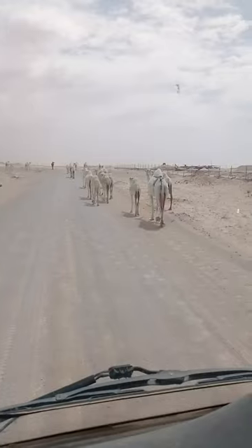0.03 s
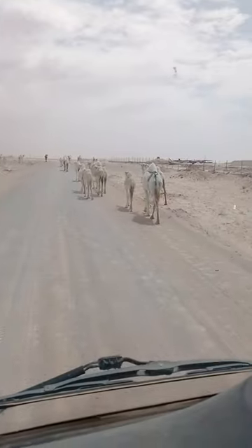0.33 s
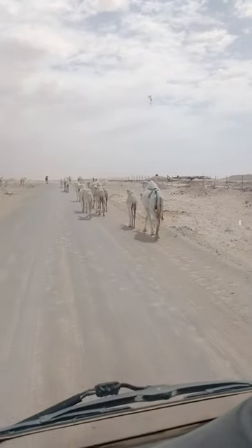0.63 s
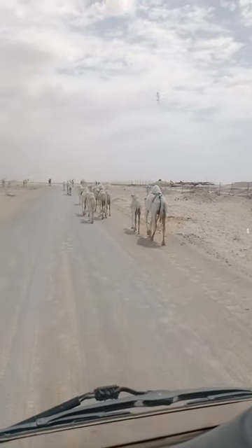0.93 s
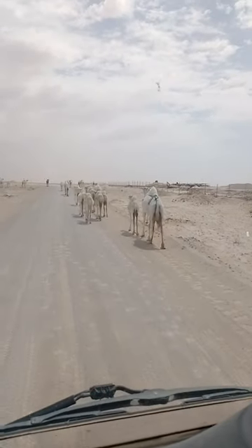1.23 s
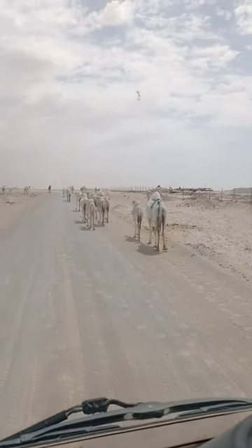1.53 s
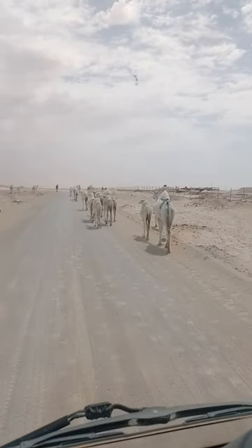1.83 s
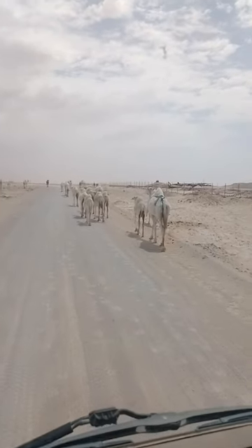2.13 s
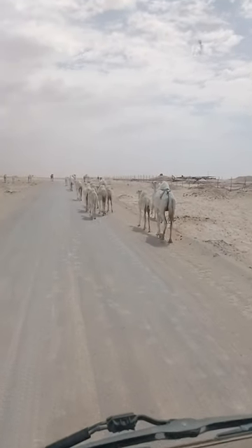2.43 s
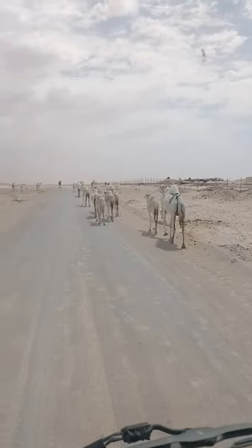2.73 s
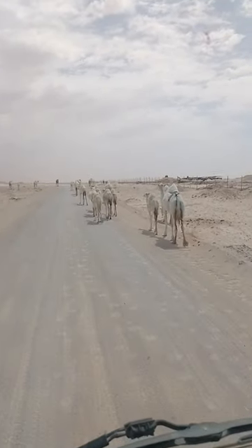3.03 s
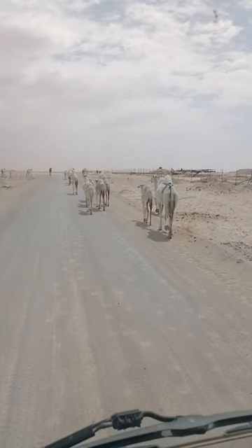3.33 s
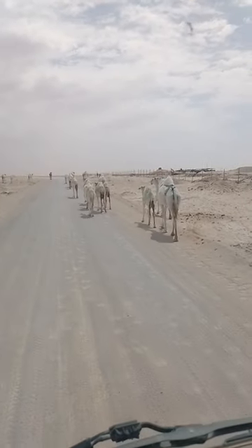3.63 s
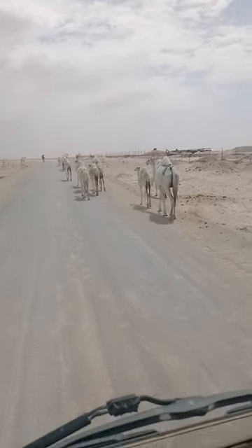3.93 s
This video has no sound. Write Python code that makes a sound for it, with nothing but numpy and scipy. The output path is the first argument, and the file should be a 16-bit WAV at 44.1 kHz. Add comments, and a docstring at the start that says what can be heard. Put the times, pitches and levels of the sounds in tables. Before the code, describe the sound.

A vehicle engine hums and clatters steadily, heard from inside while creeping along a dirt road.

```python
"""A six-cylinder engine roars softly just above idle, heard inside a vehicle creeping along a dirt road.
Its firings hum and clatter through the wall of the cabin. A panel throbs once per engine cycle,
and a belt twitters once per turn. Underneath, the tyres rumble and knock over ruts and the body booms.
Now and then something in the cabin rubs and gives a thin, high squeak."""
import sys
import numpy as np
from scipy import signal
from scipy.fft import rfft, irfft
from scipy.io import wavfile
from scipy.ndimage import uniform_filter1d

SR = 44100
rng = np.random.default_rng(int(sys.argv[2]) if len(sys.argv) > 2 else 0)


def digitize_waveform(pressure):
    """Quantize a signal to 16-bit integers and store it at the path in sys.argv[1].

    Rows of a 2-D input are taken as channels; values are limited to [-1, 1].
    """
    field = np.atleast_2d(pressure).T
    bounded = np.clip(field, -1, 1)
    quanta = np.round(bounded * 32767).astype(np.int16)
    wavfile.write(sys.argv[1], SR, quanta)


N = 176400  # 4 seconds
CYLINDERS = 6


# Where the roar's treble ends, and how loud the roar is: time_s, edge_hz, level_db
ROAR = [(.1, 997, -40), (.43, 975, -39.5), (.5, 990, -44), (.56, 946, -39.5), (.78, 890, -40),
        (.92, 916, -41), (1.2, 990, -39), (1.32, 880, -41.5), (1.42, 906, -40.5), (1.56, 870, -43.5),
        (1.66, 820, -41.5), (1.72, 820, -48), (1.8, 790, -48.5), (1.88, 640, -45.5), (2.02, 705, -41),
        (2.22, 693, -42), (2.42, 720, -40), (2.5, 940, -41.5), (2.72, 900, -42), (2.86, 1060, -40),
        (3.2, 1110, -40), (3.36, 1100, -38), (3.6, 1120, -40), (3.78, 1000, -41.5), (4, 1090, -38)]
# The roar's tone, from low to high: pitch_hz, gain_db
ROAR_TONE = [(50, -33), (150, -13), (205, -16), (260, -.5), (325, 3.5), (400, -4), (470, -2.5), (540, -1.5),
             (660, -2.5), (790, -3.5), (930, -1.5), (1200, -14.5)]
def roar(t, pulses):
    """The firings make pulsing noise that turns brighter and duller as its upper edge moves."""
    edge_hz, level_db = curve(ROAR, t)
    sound = colour(noise() * pulses, ROAR_TONE)
    hz, times, slices = signal.stft(sound, SR, nperseg=1024)
    share = hz[:, None] / np.interp(times, t, edge_hz)  # 1 at the edge
    peak = undb(2 * np.exp(-((share - .92) / .13) ** 2))  # a small lift just under the edge
    cutoff = 1 / np.sqrt(1 + share ** 50)
    return signal.istft(slices * peak * cutoff, SR)[1][:N] * undb(level_db)


# The clatter's tone: pitch_hz, gain_db
CLATTER_TONE = [(50, -24), (300, 4), (800, 1), (960, -1.5), (1120, -1), (1300, 2), (1550, -3), (1950, -4),
                (2300, -10.5), (3100, -15.5), (3800, -12.5), (4600, -22.5), (9000, -25.5), (15000, -40)]
def clatter(pulses, firing_hz):
    """The firings also make a lighter, brighter noise, louder when the engine runs faster."""
    sound = colour(noise() * pulses, CLATTER_TONE)
    level_db = -55 + .37 * (firing_hz - firing_hz.mean()) + .47 * wander(4.8)
    return sound * undb(level_db)


# How hard each cylinder fires, one value each: gain_db
CYLINDER_DB = [-0.45, -1.06, -0.47, 1, -0.27, -0.47]
def combustion(t, firings, firing_hz):
    """Each firing, a little stronger or weaker than the last, sets off roar and clatter."""
    roar_fade_s, clatter_fade_s = .12, .15
    count = firings.astype(int)
    strength = undb(np.array(CYLINDER_DB)[count % CYLINDERS] + noise()[count])
    age_s = (firings % 1) / firing_hz  # time since the last firing
    roar_pulses = strength * np.exp(-age_s / roar_fade_s)
    clatter_pulses = strength * np.exp(-age_s / clatter_fade_s)
    return roar(t, roar_pulses) + clatter(clatter_pulses, firing_hz)


# Hum levels at 1, 2 and 3 times the firing rate: time_s, first_db, second_db, third_db
HUM = [(.1, -62, -62, -57.5), (1.15, -62.5, -60.5, -62.5), (1.42, -59, -69, -83), (1.6, -79, -62, -69),
       (1.84, -78, -78, -60), (2.0, -59.5, -78, -71), (2.35, -61, -66, -60), (2.5, -64, -68, -55.5),
       (2.75, -64, -68, -59.5), (3.2, -61, -60, -58.5), (3.45, -69, -68, -52), (3.7, -62, -69, -58),
       (4, -65, -62, -61)]
def hum(t, firings):
    """The firings fill the cabin with three low tones; the highest swells once per engine cycle."""
    tones = []
    for multiple, level_db in enumerate(curve(HUM, t), start=1):
        gain = undb(level_db + 1.4 * wander(14))
        tones.append(gain * np.sqrt(2) * np.sin(2 * np.pi * (multiple * firings + rng.random())))
    first, second, third = tones
    return first + second + third * swell(firings / CYLINDERS, peak_at=.14, depth_db=3.5)


THROB_AT = .62  # how far through each engine cycle the panel is loudest
# How loud the panel is, throb aside: time_s, level_db
PANEL = [(.1, -54.5), (.4, -54), (.7, -53), (.86, -48), (1.8, -49), (1.95, -55), (2.1, -53), (2.28, -53),
         (2.44, -51), (2.65, -53.5), (4, -56.5)]
def panel(t, cycles):
    """The engine shakes a panel, whose ringing swells once per cycle."""
    ringing = tone(hz=560 + 12 * wander(60))
    throb = swell(cycles, THROB_AT, depth_db=8.5)
    return ringing * throb * undb(curve(PANEL, t)[0] + wander(40.9))


# The belt's slow drift in pitch and loudness: time_s, pitch_shift_hz, level_db
BELT = [(.1, 80, -73), (.32, 80.5, -71.5), (.65, 20, -73.5), (.97, -10, -73), (1.3, -80, -73.5),
        (1.7, -40, -78), (2.05, 70, -76), (2.4, -39, -79.5), (3.35, 30, -75.5), (4, 8, -84)]
def belt(t, turns):
    """The belt twitters once per engine turn; each twitter has its own strength and falling pitch."""
    pitch_hz, fall_hz, peak_at = 3940, 70.5, .98
    shift_hz, level_db = curve(BELT, t)
    turn, progress = np.divmod(turns - peak_at + 1.5, 1)  # loudest at progress 0.5
    own_pitch, own_level = rng.standard_normal((int(turn[-1]) + 1, 2))[turn.astype(int)].T
    hz = pitch_hz + shift_hz + 55 * own_pitch - fall_hz * (progress - .5)
    whistle = tone(hz + 40 * wander(18) + 85 * wander(600))  # a slow waver and a fast, rough one
    gain = undb(level_db + 1.5 * own_level + 2 * wander(200))
    return whistle * swell(turns, peak_at, depth_db=6) * gain


# The tone of the tyres' rumble: pitch_hz, gain_db
RUMBLE_TONE = [(22, -48), (52, -31), (66, -13), (92, -6), (118, -6.5), (140, -8), (155, -23.5), (168, -35),
               (185, -25), (210, -11.5), (300, 1), (430, -3), (600, -4.5), (820, -15), (1000, -16.5),
               (1150, -24.5), (3000, -50)]
# The tone of the hiss and the grit: pitch_hz, gain_db
HISS_TONE = [(1500, 16), (3300, 1.5), (4700, -3), (6800, 4), (8000, 8), (9000, 4), (10300, 8), (11200, -3),
             (13000, -6), (15500, -48)]
def tyres():
    """Tyres rumble on packed dirt and crackle over fine grit, under a faint hiss."""
    rumble_db, hiss_db, grit_db, grains_per_s = -46.5, -66, -74.5, 170
    rumble = colour(noise(), RUMBLE_TONE) * undb(rumble_db + 2.3 * wander(7.12))
    hiss = colour(noise(), HISS_TONE) * undb(hiss_db + .8 * wander(29.7))
    struck = rng.random(N) < grains_per_s / SR
    grains = struck * np.sign(noise()) * undb(2.5 * noise())
    return rumble + hiss + colour(grains, HISS_TONE) * undb(grit_db)


# Knocks from the ruts: start_s, level_db
RUTS = [(0.529, -44.5), (1.134, -40), (1.363, -38), (1.645, -39), (1.781, -43.5), (1.893, -42.5),
        (2.261, -43), (2.431, -42.5)]
# The tone of a knock: pitch_hz, gain_db
RUT_TONE = [(100, -28), (220, -15), (320, 10.5), (560, 5), (760, -5), (1000, -15), (2000, -26.5),
            (15000, -62)]
def ruts(t):
    """A tyre hits a rut with a short, dull knock."""
    return hits(t, RUTS, RUT_TONE, fade_s=.015)


# Low booms of the vehicle's body: start_s, length_s, pitch_hz, level_db
BOOMS = [(0.279, 0.029, 332, -43), (0.667, 0.026, 323.4, -42), (0.73, 0.037, 312, -45),
         (0.83, 0.25, 440, -49), (0.888, .035, 319.7, -46), (0.958, 0.035, 305, -42),
         (1.993, 0.052, 349.8, -42), (2.055, 0.14, 356.6, -48), (2.995, 0.042, 324.3, -45),
         (3.22, 0.044, 312, -42), (3.55, 0.026, 335, -44), (3.738, .03, 315, -45),
         (3.863, 0.075, 327.9, -44)]
def booms(t):
    """The body booms briefly as it rides over uneven ground."""
    return sum(burst(t, start_s, length_s) * undb(level_db) * tone(pitch_hz + 14 * wander(80))
               for start_s, length_s, pitch_hz, level_db in BOOMS)


# Squeaks in the cabin: start_s, length_s, ring_db, scrape_db
SQUEAKS = [(0.136, 0.1, -69, -64.5), (0.37, 0.1, -73.5, -70), (1.117, 0.047, -62, -66),
           (1.945, 0.034, -63, -65), (1.977, 0.059, -71.5, -72), (2.908, 0.049, -62, -61),
           (2.952, 0.17, -81, -65), (3.813, 0.14, -59.5, -61), (3.955, .06, -68, -63.5)]
# The high notes that every squeak rings with: pitch_hz, width_hz, gain_db
SQUEAK_NOTES = [(7460, 110, -9), (7650, 24, -1.5), (7760, 180, -1)]
def squeaks(t):
    """Something in the cabin rubs briefly, making a gritty scrape and a high ring."""
    ringing = unit(sum(undb(db) * ring(hz, width_hz) for hz, width_hz, db in SQUEAK_NOTES))
    grit = scrape_grit()
    sound = np.zeros(N)
    for start_s, length_s, ring_db, scrape_db in SQUEAKS:
        scrape = grit + undb(-5) * scrape_overtones()
        sound += burst(t, start_s, length_s) * (undb(ring_db) * ringing + undb(scrape_db) * scrape)
    return sound


# The tone of the scraping: pitch_hz, gain_db
SCRAPE_TONE = [(2000, 16), (3500, 12.5), (4700, 7), (7000, 5), (8000, 14), (8800, 13), (10500, 1),
               (11600, -1), (13000, -2), (15500, -4)]
def scrape_grit():
    """Rubbing makes a noise whose level flickers fast, so it sounds grainy."""
    return colour(noise() * undb(2.8 * wander(400)), SCRAPE_TONE)


# Thin, high notes within the scraping: pitch_hz, gain_db
SCRAPE_NOTES = [(5400, -2), (6400, 0), (8930, -1), (9350, -2), (9900, -2), (10430, 2), (10650, 0),
                (10950, -1), (11230, 0), (11600, -1), (11850, -3), (12300, -4), (12900, -4), (13400, -6),
                (14200, -9), (15500, -9)]
def scrape_overtones():
    """One rub rings with many thin notes, tuned and balanced a little differently each time."""
    width_hz, scatter_db, detune = 38, 4, .008
    hz = np.fft.rfftfreq(N, 1 / SR)
    peaks = 0
    for pitch_hz, gain_db in SCRAPE_NOTES:
        gain = undb(gain_db + scatter_db * rng.standard_normal())
        centre_hz = pitch_hz * (1 + detune * rng.standard_normal())
        peaks += gain / (1 + ((hz - centre_hz) / width_hz) ** 2)
    return unit(irfft(rfft(noise()) * peaks, N))


# Faint high tones: start_s, length_s, pitch_hz, level_db
HIGH_TONES = [(0.684, .04, 10500, -72), (0.793, 0.053, 11520, -68.5), (0.927, .04, 11520, -77),
              (1.56, .022, 10500, -80), (1.78, .04, 5450, -76), (2.899, 0.055, 6390, -69),
              (2.967, 0.12, 10430, -76), (3.293, 0.02, 11520, -65), (3.318, .03, 10430, -74),
              (3.397, .035, 11520, -76)]
def high_tones(t):
    """Brief, faint, thin high tones, each on one pitch."""
    return sum(burst(t, start_s, length_s) * undb(level_db) * ring(pitch_hz, width_hz=63)
               for start_s, length_s, pitch_hz, level_db in HIGH_TONES)


# Faint ticks: start_s, level_db
TICKS = [(.857, -52), (.974, -51)]
# The tone of a tick: pitch_hz, gain_db
TICK_TONE = [(2000, -11), (4500, 0), (7500, -6), (8500, 1), (12000, -4), (15500, -10)]
def ticks(t):
    """Tiny, dry clicks die away almost at once."""
    return hits(t, TICKS, TICK_TONE, fade_s=.0014)


def cabin(sound):
    """Echoes in the cabin partly cancel one low pitch at the seat (a standing wave)."""
    pitch_hz, width_hz, dip_db = 160, 16, -4.5
    hz = np.fft.rfftfreq(N, 1 / SR)
    dip = undb(dip_db * np.exp(-((hz - pitch_hz) / width_hz) ** 2))
    return irfft(rfft(sound) * dip, N)


def undb(db):
    """Turn decibels into a number to multiply by."""
    return 10 ** (np.asarray(db) / 20)


def unit(x):
    """Scale a signal to an average strength (rms) of 1."""
    return x / np.sqrt(np.mean(x ** 2))


def curve(table, t):
    """Join a table's rows with straight lines in time; one curve per value column."""
    times, *columns = np.array(table).T
    return [np.interp(t, times, column) for column in columns]


def noise():
    """An even hiss: white noise."""
    return rng.standard_normal(N)


def wander(per_s):
    """A smooth random wobble, about 1 in size."""
    step = int(SR / per_s)
    stairs = noise()[np.arange(N) // step]
    return unit(uniform_filter1d(uniform_filter1d(stairs, step), step))


def colour(sound, tone_table):
    """Shape a sound's bass and treble with a tone table; strength 1."""
    pitch_hz, gain_db = np.array(tone_table).T
    hz = np.maximum(np.fft.rfftfreq(N, 1 / SR), 1)
    gain = undb(np.interp(np.log(hz), np.log(pitch_hz), gain_db))
    return unit(irfft(rfft(sound) * gain, N))


def tone(hz):
    """A pure tone that follows a moving pitch; strength 1."""
    return np.sqrt(2) * np.sin(2 * np.pi * np.cumsum(hz) / SR)


def ring(pitch_hz, width_hz):
    """Noise narrowed until it rings around one pitch; strength 1."""
    hz = np.fft.fftfreq(N, 1 / SR)
    flutter = np.fft.ifft(np.fft.fft(noise()) / (1 + 1j * hz / width_hz * np.sqrt(2)) ** 2)
    return unit(np.real(flutter * np.exp(2j * np.pi * pitch_hz * np.arange(1, N + 1) / SR)))


def swell(turns, peak_at, depth_db):
    """A gain that rises and falls once per turn; a negative depth turns the peak into a dip."""
    return unit(undb(depth_db * np.cos(2 * np.pi * (turns - peak_at))))


def burst(t, start_s, length_s, ramp_s=.014):
    """A gain that rises, holds and falls."""
    return np.clip(np.minimum(t - start_s, start_s + length_s - t) / ramp_s + .5, 0, 1)


def hits(t, table, tone_table, fade_s):
    """Bursts of noise that start suddenly and die away."""
    gain = sum(undb(db) * (t >= start_s) * np.exp(-np.abs(t - start_s) / fade_s) for start_s, db in table)
    return colour(noise() * gain, tone_table) * np.sqrt(np.mean(gain ** 2))


# Engine speed, as firings per second: time_s, firing_hz
ENGINE_SPEED = [(0.1, 37.9), (0.59, 38.3), (1.15, 41.2), (1.53, 37.6), (1.93, 36.7), (2.04, 37.3),
                (2.49, 35.1), (3.12, 36.1), (3.68, 35.4), (4.0, 37.6)]
# How much the roar and clatter rise and fall in each engine cycle: time_s, depth_db
ENGINE_SWAY = [(.1, -0.7), (1.2, 0.1), (1.75, 0.5), (2.45, -0.3), (3, -0.2)]
def scene():
    """Engine speed drives every turning part; the road and squeaks go their own way."""
    t = np.arange(N) / SR
    firing_hz = curve(ENGINE_SPEED, t)[0]
    firings = np.cumsum(firing_hz) / SR
    cycles = firings / CYLINDERS  # in one cycle, every cylinder fires once
    sway = swell(cycles, THROB_AT, depth_db=curve(ENGINE_SWAY, t)[0])
    engine = hum(t, firings) + combustion(t, firings, firing_hz) * sway
    engine += panel(t, cycles) + belt(t, turns=2 * cycles)
    background = ruts(t) + ticks(t) + tyres() + booms(t) + squeaks(t) + high_tones(t)
    return cabin(engine + background)[None]


def record(dry):
    """The sound comes in after a near-silent moment, with its very highest treble cut away."""
    start_s, top_hz = .082, 15700
    fade_in = np.clip((np.arange(N) / SR - start_s) / .002, .002, 1)
    treble_cut = signal.ellip(12, .2, 70, top_hz, fs=SR, output="sos")
    return signal.sosfilt(treble_cut, dry * fade_in)


dry = scene()
out = record(dry)
digitize_waveform(out)
```